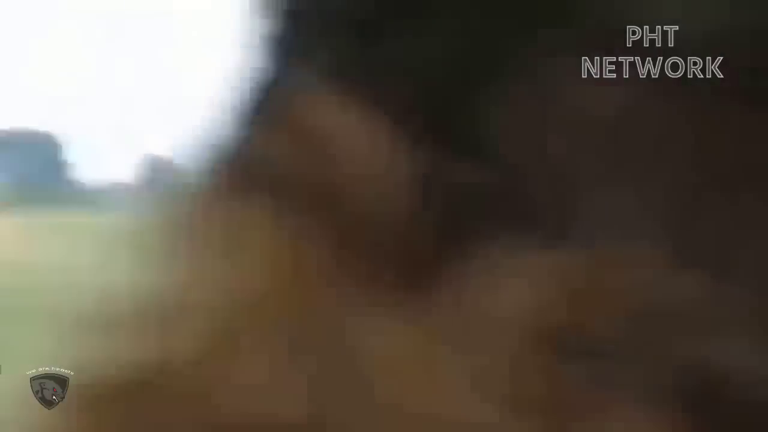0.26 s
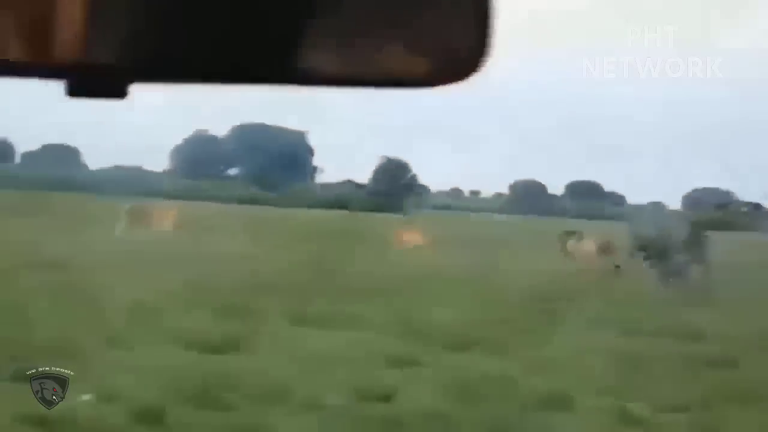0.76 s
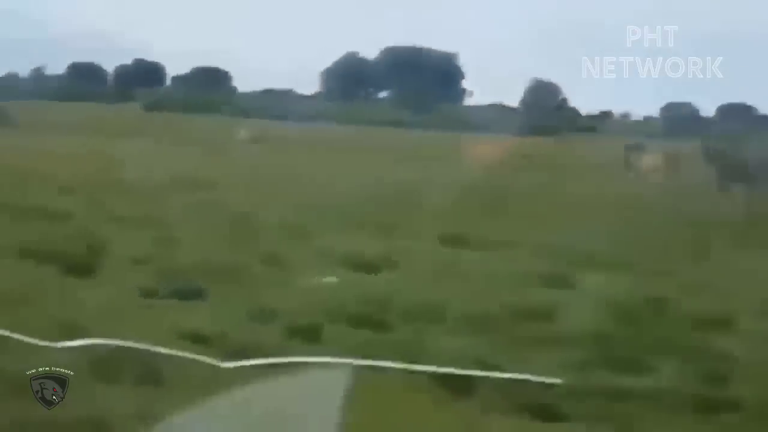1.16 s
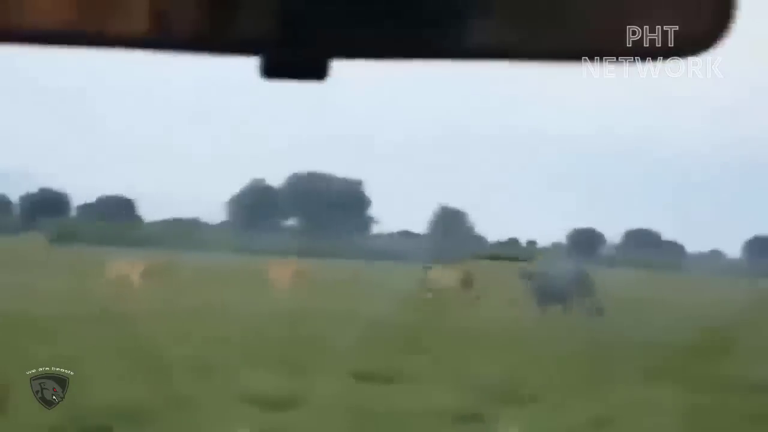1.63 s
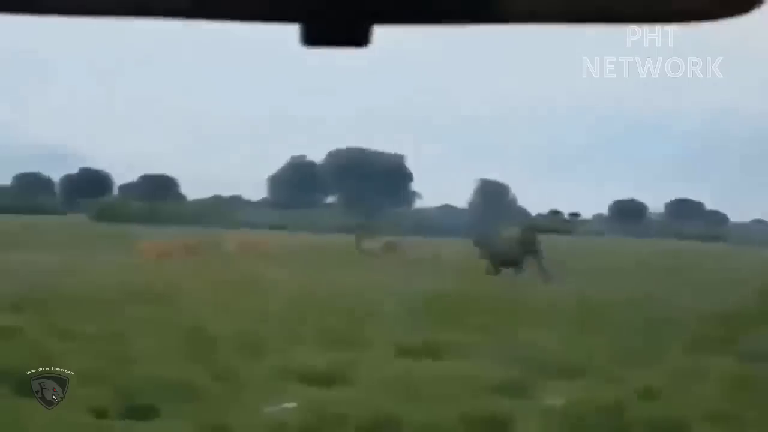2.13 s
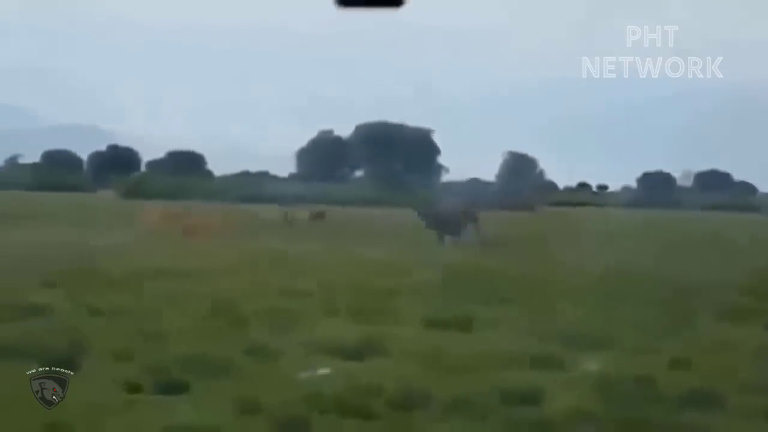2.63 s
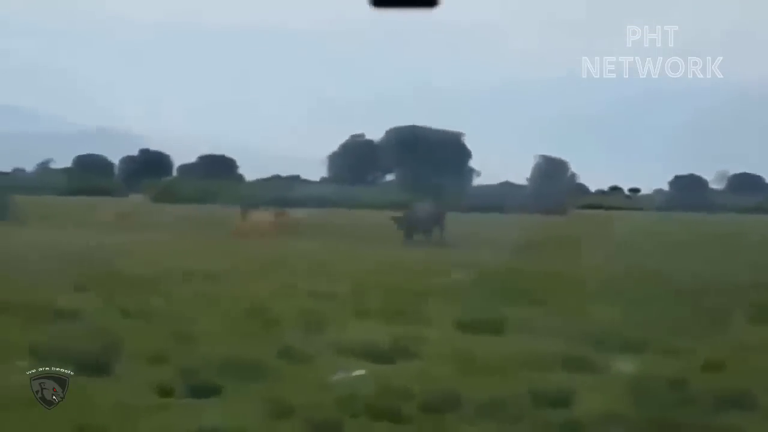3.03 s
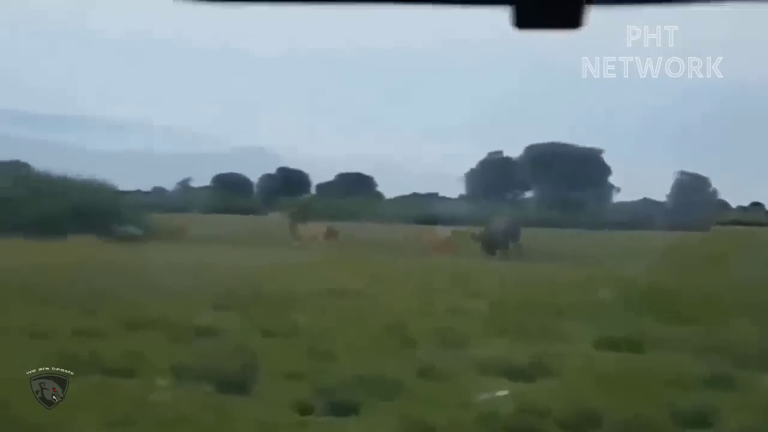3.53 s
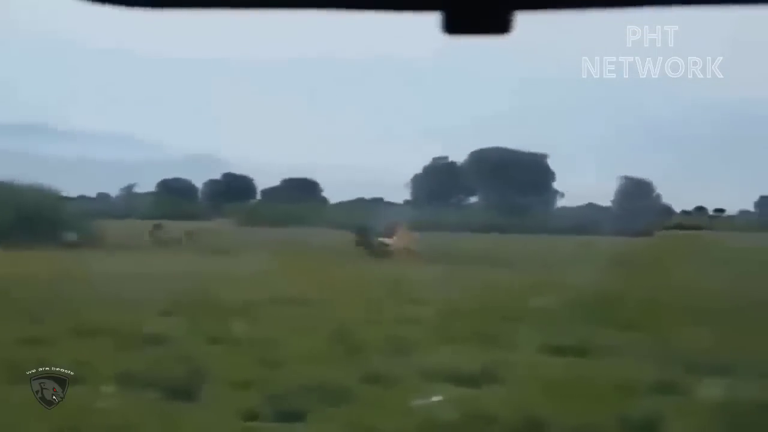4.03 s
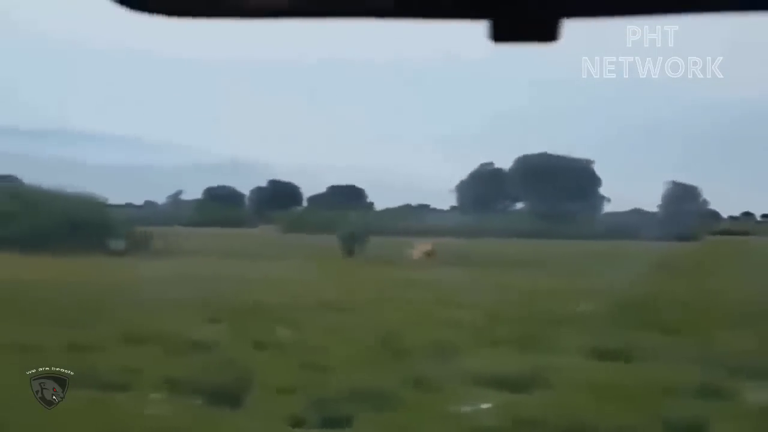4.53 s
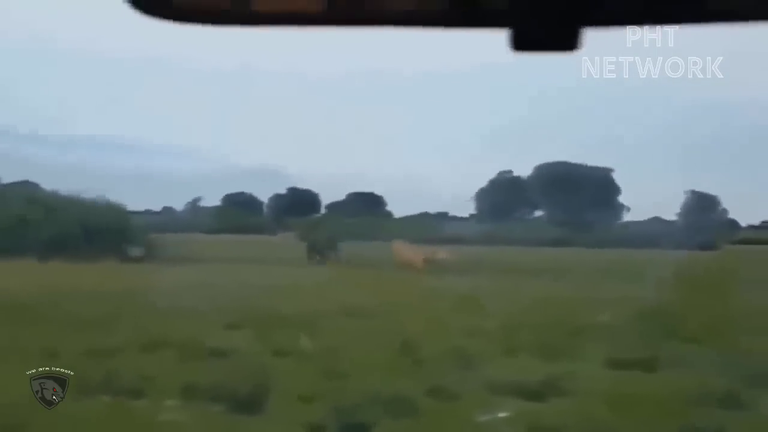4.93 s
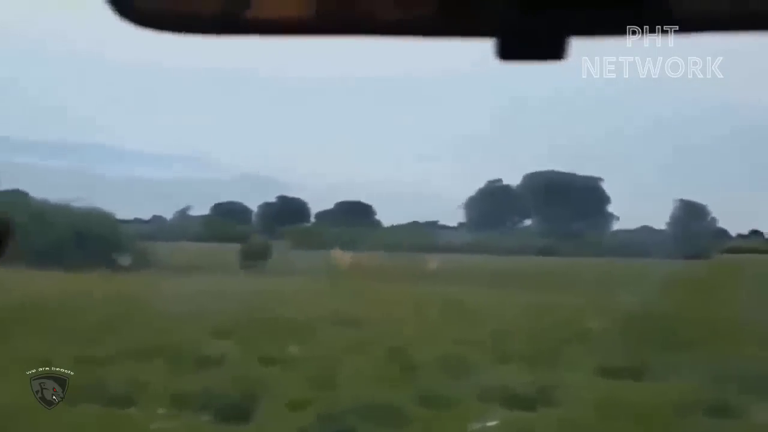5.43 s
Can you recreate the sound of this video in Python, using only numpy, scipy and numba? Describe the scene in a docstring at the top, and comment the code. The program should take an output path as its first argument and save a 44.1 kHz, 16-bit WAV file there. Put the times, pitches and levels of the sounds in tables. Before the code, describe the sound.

On open grassland, busy birds chirp and cry over a low throbbing hum while one large animal gives a coarse, guttural bellow and a short nasal intake.

```python
"""Open grassland: a buffalo straight ahead bellows once, long and rattling, then draws air through its muzzle.
The bellow is bursts of fold slaps ringing a long throat; the drawn breath is noise through the nostrils.
Birds mew, squawk, croak and trill as stacks of harmonics; small ones chirp as swept tones or rasp as
gliding noise, and the bushes scatter all their calls. Beneath lie a low throbbing rumble and a thin hiss,
with a rustle, two microphone bumps and one faint low tone."""
import sys
import numpy as np
from scipy import signal
from scipy.fft import rfft, irfft
from scipy.io import wavfile
from scipy.ndimage import uniform_filter1d
from numba import njit

SR = 44100
rng = np.random.default_rng(int(sys.argv[2]) if len(sys.argv) > 2 else 0)


def unload_wav(signal):
    """Save mono or channel-first audio to the path in sys.argv[1] as 16-bit WAV at rate SR, clipped to [-1, 1]."""
    wavfile.write(
        sys.argv[1],
        SR,
        np.round(np.clip(np.atleast_2d(signal).T, -1, 1) * 32767).astype(np.int16),
    )


N = 250047
TIME = np.arange(N) / SR  # [s]


def undb(db):
    """Decibels to gain."""
    return 10 ** (np.asarray(db) / 20)


def unit(x):
    """Scale to rms 1."""
    return x / np.sqrt(np.mean(x ** 2) + 1e-18)


def curves(table, t=TIME):
    """Each column of a table after the time column, joined by straight lines in time."""
    s, *columns = np.transpose(table)
    return [np.interp(t, s, c) for c in columns]


def swell(start, attack, hold, release):
    """Gain that rises, holds and falls, all times in seconds."""
    return np.interp(TIME, start + np.cumsum([0, attack, hold, release]), [0, 1, 1, 0])


def colour(points, hz):
    """Gain of a (frequency [Hz], level [dB]) spectrum at the given frequencies."""
    f, db = np.transpose(points)
    return undb(np.interp(np.log(np.maximum(hz, 1)), np.log(f), db))


def noise(points):
    """Noise of rms 1 with the given spectrum, dying away outside its ends."""
    hz = np.arange(N // 2 + 1) * SR / N
    low_end = np.minimum(hz / points[0][0], 1) ** 4
    high_end = np.minimum(points[-1][0] / (hz + 1), 1) ** 4
    white = rfft(rng.standard_normal(N))
    return unit(irfft(white * colour(points, hz) * low_end * high_end, N))


def wide_noise(points, side_db):
    """Stereo noise from a part shared by both channels and a part opposed between them."""
    return noise(points) + undb(side_db) * noise(points) * np.array([[1], [-1]])


def walk(rate):
    """Smooth chance of rms 1 that changes rate times a second."""
    k = max(int(SR / rate), 1)
    return unit(uniform_filter1d(np.repeat(rng.standard_normal(N // k + 1), k), k)[:N])


@njit
def svf(x, hz, width):
    """State-variable band-pass with a moving centre."""
    y, b, l = np.empty(len(x)), 0., 0.
    for i in range(len(x)):
        g, k = np.tan(np.pi * hz[i] / SR), width / hz[i]
        v = (b + g * (x[i] + 1e-18 - l)) / (1 + g * (g + k))
        b, l, y[i] = 2 * v - b, l + 2 * g * v, k * v
    return y


def ring(x, hz, width_hz):
    """One resonance, gain 1 at its centre, which may move."""
    return svf(x, hz * np.ones(N), float(width_hz))


def ring_twice(x, hz, width_hz):
    """Two equal resonances in a row, for steeper sides."""
    return ring(ring(x, hz, width_hz), hz, width_hz)


def ear_gains(pan_db):
    """Left and right gains of rms 1, with the left pan_db above the right."""
    return unit(undb(np.array([[pan_db], [-pan_db]]) / 2))


def place(x, pan_db, lag_ms):
    """Set a source left or right by level and by the lag of the right channel."""
    hz = np.arange(N // 2 + 1) * SR / N
    late = irfft(rfft(x) * np.exp(-2j * np.pi * hz * lag_ms / 1000), N)
    return ear_gains(pan_db) * np.array([x, late])


def bushes(x, wet_db, t60):
    """Add the diffuse scatter from grass and bushes, different at each ear, falling 60 dB in t60 seconds."""
    t = TIME[:SR // 2]
    tail = rng.standard_normal((2, len(t))) * undb(-60 * t / t60)
    tail /= np.linalg.norm(tail, axis=1, keepdims=True)
    return x + undb(wet_db) * signal.fftconvolve(x.mean(axis=0)[None], tail, axes=1)[:, :N]


# spectrum of the low rumble: (frequency [Hz], relative level [dB])
RUMBLE_SPECTRUM = [(18, 6), (30, -4.5), (42, -8.5), (58, 3.5), (75, -6), (100, -5.5), (122, -10),
                   (148, -5.5), (180, -15), (240, -15), (300, -19.5), (400, -30.5)]
RUMBLE_DB, RUMBLE_START_DB, RUMBLE_GROW_S = -44.5, -2.5, 1.5  # it starts weaker and grows


def rumble(throb_hz=16.0, throb_db=0.5):
    """Low noise throbs gently in both channels alike, over deep noise opposed between them."""
    throb = undb(throb_db * np.sin(2 * np.pi * throb_hz * TIME))
    growth_db = RUMBLE_START_DB * np.maximum(1 - (TIME / RUMBLE_GROW_S) ** 2, 0)
    central = unit(noise(RUMBLE_SPECTRUM) * throb) * undb(RUMBLE_DB + growth_db)
    opposed = undb(-47.5) * noise([(20, -5.0), (60, -22), (150, -23.5), (400, -38.0)]) * np.array([[1], [-1]])
    return central + opposed


# spectrum of the steady hiss: (frequency [Hz], relative level per Hz [dB])
HISS_SPECTRUM = [(300, -2.5), (500, -5), (1000, -6), (1500, -8.5), (2200, -7), (3200, -10), (4300, -12.5),
                 (6000, -14.5), (9000, -16), (13000, -16), (15500, -29)]
HISS_DB = -55


def hiss(flutter_db=2.0):
    """Wide noise whose level flutters a little."""
    return wide_noise(HISS_SPECTRUM, side_db=-1.0) * undb(HISS_DB + flutter_db * walk(45))


# spectrum of the rustle: (frequency [Hz], relative level [dB])
RUSTLE_SPECTRUM = [(150, 7), (400, -3), (900, -4), (1600, -3), (2600, -3.5), (3600, -6.5), (6000, -12.5),
                   (9000, -17), (13000, -14.5), (16000, -17)]
RUSTLE_ATTACK_S, RUSTLE_HOLD_S, RUSTLE_RELEASE_S, RUSTLE_DB = 0.49, 0.28, 0.44, -46


def rustle():
    """A soft flickering noise swells near the start."""
    leaves = wide_noise(RUSTLE_SPECTRUM, side_db=-4.0)
    flicker = undb(RUSTLE_DB + 1.5 * walk(28.7))
    return leaves * flicker * swell(0, RUSTLE_ATTACK_S, RUSTLE_HOLD_S, RUSTLE_RELEASE_S)


# soft bumps of the handled microphone: (time [s], level [dB])
BUMP_TIMES = [(0.361, -44.5), (.61, -44.5)]
# their dull spectrum: (frequency [Hz], relative level [dB])
BUMP_SPECTRUM = [(150, -0.5), (700, -5), (1500, -7.5), (4000, -17)]
BUMP_ATTACK_S, BUMP_RELEASE_S = 0.0091, 0.049


def bumps():
    """Dull brushes against the microphone amid the rustle: short bursts of noise."""
    bursts = sum(undb(db) * swell(start, BUMP_ATTACK_S, 0, BUMP_RELEASE_S) for start, db in BUMP_TIMES)
    return noise(BUMP_SPECTRUM) * bursts


LOW_TONE_START_S, LOW_TONE_ATTACK_S, LOW_TONE_HOLD_S, LOW_TONE_RELEASE_S = 3.65, 0.101, 0.124, 0.14
LOW_TONE_HZ, LOW_TONE_DB = 276, -55.5  # pitch at full strength, before the waver


def low_tone(waver=0.01, sag=0.16):
    """A short, faint, wavering sine whose pitch sags where it is weak."""
    strength = swell(LOW_TONE_START_S, LOW_TONE_ATTACK_S, LOW_TONE_HOLD_S, LOW_TONE_RELEASE_S)
    hz = LOW_TONE_HZ * (1 + waver * walk(40) - sag * (1 - strength))
    return unit(np.sin(2 * np.pi * np.cumsum(hz) / SR)) * undb(LOW_TONE_DB) * strength


def far_birds(lowest_db=-64.5, range_db=4, count=190):
    """A loose chorus of faint falling chirps further off, at chance times, leaning left."""
    out = np.zeros((2, N))
    for when, pitch, span, size, side in rng.random((count, 5)):
        start = when * N / SR
        at = np.flatnonzero((TIME >= start) & (TIME < start + .03 + .05 * span))
        hz = 2600 * 2.6 ** pitch * np.linspace(1, .72, len(at))
        note = np.sin(2 * np.pi * np.cumsum(hz) / SR) * np.hanning(len(at))
        out[:, at] += undb(lowest_db + range_db * size) * note * np.array([[1], [side]])
    return out


# hoarse, scratchy bird notes: (time [s], length [s], start centre [Hz], end centre [Hz], filter width [Hz],
# level [dB], left minus right [dB])
RASP_NOTES = [(0, 0.049, 4800, 4800, 2600, -47, -1), (0.134, 0.054, 6650, 7500, 2200, -46.5, -2),
              (0.176, 0.083, 7600, 6100, 1400, -49.5, 1), (0.233, 0.073, 4900, 3270, 2000, -47.5, 1),
              (0.36, 0.33, 2450, 2600, 1100, -53, 1), (0.525, .11, 5260, 4700, 1900, -50, 4),
              (1.493, 0.057, 2280, 3150, 1200, -44.5, -3), (1.532, 0.034, 2710, 1520, 1000, -46.5, 15),
              (1.579, 0.015, 2650, 1530, 800, -44, 12), (1.265, .02, 2500, 2100, 700, -41, 14),
              (3.988, 0.082, 6200, 3740, 900, -57, 6), (4.102, .05, 2500, 2060, 700, -48, 9),
              (4.358, 0.058, 2700, 2450, 800, -44, 18), (4.478, 0.019, 2840, 2430, 600, -43, -12)]


def rasps(grain_db=4, grain_hz=260):
    """Hoarse bird notes: scratchy air through one gliding resonance, passed twice."""
    out = np.zeros((2, N))
    air = rng.standard_normal((2, N)) * undb(grain_db * walk(grain_hz))
    for start, length, first_hz, last_hz, width_hz, db, pan_db in RASP_NOTES:
        at = np.flatnonzero((TIME >= start) & (TIME < start + length))
        hz = np.geomspace(first_hz, last_hz, len(at))
        width = float(width_hz)
        note = np.array([svf(svf(ear[at], hz, width), hz, width) for ear in air])
        out[:, at] += undb(db) * unit(note * signal.windows.tukey(len(at), .6) * ear_gains(pan_db))
    return out


# quick upward flicks: (time [s], length [s], start pitch [Hz], level [dB], left minus right [dB], rise [octaves])
UPWARD_FLICKS = [(0.038, 0.024, 4400, -45, 19, 0.77), (0.205, .016, 4700, -51, 4, 0.51),
                 (0.526, 0.012, 3500, -41, 16, 0.89), (0.565, 0.0088, 3500, -41, 17, .62),
                 (0.6, 0.012, 3500, -42, 18, .62), (1.268, 0.029, 1270, -49, 16, .32),
                 (1.29, .048, 1950, -37, 22, .45), (1.561, 0.025, 1400, -38, 19, 1),
                 (3.826, 0.023, 1975, -46.5, 21, 0.67), (4.469, 0.012, 2400, -36, -15, 0.9)]
# steep downward slurs: (time [s], length [s], start pitch [Hz], level [dB], left minus right [dB])
DOWNWARD_SLURS = [(0.119, 0.031, 6240, -47, 20), (0.235, 0.021, 4400, -37, 17),
                  (0.246, 0.067, 3240, -42.5, 9), (1.519, 0.027, 4600, -47, -15),
                  (1.875, 0.077, 5620, -50, 9), (2.078, 0.054, 5760, -38.5, -1),
                  (2.104, 0.069, 7370, -44, 2), (3.045, 0.065, 3910, -52, 20),
                  (3.726, 0.052, 6820, -48.5, 8), (3.758, 0.056, 3890, -41.5, 26),
                  (4.29, 0.026, 7370, -48, 13), (4.317, 0.045, 3740, -36.5, 25),
                  (4.395, 0.059, 2900, -41.5, 24), (4.759, 0.027, 5020, -47, 17)]
# level pips that droop at the end: (time [s], length [s], pitch [Hz], level [dB], left minus right [dB])
DROOPING_PIPS = [(0.93, 0.087, 7300, -54.5, 5), (1.324, 0.08, 4180, -57, -1),
                 (1.442, 0.034, 4780, -53.5, 8), (1.675, 0.16, 8230, -54, 4),
                 (1.685, 0.056, 7120, -49.5, 20), (2.311, 0.061, 4170, -53, 24),
                 (2.697, 0.035, 5800, -54.5, 10), (2.812, 0.075, 6970, -54.5, 11.5),
                 (2.963, 0.028, 4070, -48, 11), (3.122, 0.024, 4080, -46, 14), (3.153, 0.054, 6280, -54, 8),
                 (3.674, 0.069, 6340, -53.5, 2), (4.132, 0.022, 5040, -50.5, 14),
                 (4.899, 0.053, 4170, -45.5, 13), (5.137, 0.043, 4160, -54.5, 13),
                 (5.259, 0.025, 5180, -51, 9), (5.367, 0.089, 7220, -54.5, 14),
                 (5.437, 0.038, 5300, -52, 6), (5.61, 0.058, 5800, -49.5, 7)]
SLUR_OCTAVES_PER_S, PIP_DROOP_OCTAVES = 15.5, .12
FLICK_BEND, SLUR_BEND, PIP_BEND = 0.58, 0.96, 2.6  # curve of the sweep: above 1 it moves late


def chirps(waver=0.0219, flicker_db=3.5, husk_db=-9, husk_width=0.1356, husk_db_per_octave=7, husk_from_hz=5000):
    """Small birds' short whistles, each one sweep, with a husky edge that grows on the higher notes."""
    out = np.zeros((2, N))
    shake, scrape, flicker = walk(500), walk(1500), walk(200)
    notes = [(*row, FLICK_BEND) for row in UPWARD_FLICKS]
    notes += [(*row, -SLUR_OCTAVES_PER_S * row[1], SLUR_BEND) for row in DOWNWARD_SLURS]
    notes += [(*row, -PIP_DROOP_OCTAVES, PIP_BEND) for row in DROOPING_PIPS]
    for start, length, first_hz, db, pan_db, octaves, power in notes:
        at = np.flatnonzero((TIME >= start) & (TIME < start + length))
        arc = first_hz * 2 ** (octaves * np.linspace(0, 1, len(at)) ** power)
        # each bird reaches the two ears out of step
        ears = np.array([[0], [np.pi / 2 * (2 * rng.random() - 1)]])
        tone = np.sin(2 * np.pi * np.cumsum(arc * (1 + waver * shake[at])) / SR + ears)
        husk = np.sin(2 * np.pi * np.cumsum(arc * (1 + husk_width * scrape[at])) / SR + ears)
        husk_gain = undb(husk_db + husk_db_per_octave * np.log2(first_hz / husk_from_hz))
        shape = unit(signal.windows.tukey(len(at), .7) * undb(flicker_db * flicker[at]))
        out[:, at] += undb(db) * shape * ear_gains(pan_db) * (tone + husk_gain * husk)
    return out


def bird_call(table, shape, jitter, shimmer_db, tuned=False, count=14):
    """Harmonics shaped by a throat, fixed (Hz) or tuned to the pitch (multiples); roughness shakes them."""
    on = (TIME >= table[0][0]) & (TIME < table[-1][0])
    hz, db, rough, *tilt = curves(table, TIME[on])
    hz = hz * (1 + jitter * rough * walk(450)[on])
    phase = 2 * np.pi * np.cumsum(hz) / SR
    k = np.arange(1, count + 1)[:, None]
    # the treble tilt acts above 1800 Hz; a table without that column has none
    tilt_gains = undb(sum(tilt) * np.log2(np.maximum(k * hz / 1800, 1)))
    gains = colour(shape, k if tuned else k * hz) * tilt_gains
    tone = (gains * np.sin(k * phase + rng.uniform(0, 2 * np.pi, (count, 1)))).sum(axis=0)
    tone /= np.sqrt((gains ** 2).sum(axis=0) / 2)
    level = undb(db + shimmer_db * rough * walk(300)[on])
    out = np.zeros(N)
    out[on] = tone * level * signal.windows.tukey(len(hz), .06)
    return out


# buzzing trills, before arch and beats: (time [s], length [s], start pitch [Hz], end pitch [Hz], level [dB])
TRILL_CALLS = [(0.108, 0.125, 2480, 2427, -48), (1.202, 0.098, 2430, 2775, -43.5),
               (1.285, 0.079, 2285, 2724, -45), (4.017, 0.08, 2454, 2518, -35.5),
               (4.128, 0.029, 2120, 1850, -43.5)]
TRILL_RATE_HZ = 53


def trills(depth_db=8, arch=0.0302, fade_db=-6, rough=0.2, beat_swing=0.059):
    """A whistle on a shallow arch of pitch, chopped into quick beats that each lift the pitch."""
    beak = [(3000, 10.0), (4500, -7), (8000, -16)]  # (frequency [Hz], relative level [dB])
    u = np.linspace(0, 1, 80)
    edge = (2 * u - 1) ** 2  # 1 at both ends, 0 in the middle
    whistle = 0
    for start, length, first_hz, last_hz, db in TRILL_CALLS:
        beat = -np.cos(2 * np.pi * TRILL_RATE_HZ * length * u) - .5
        hz = (first_hz + (last_hz - first_hz) * u) * (1 + arch * (1 - edge) + beat_swing * beat)
        level_db = db + fade_db * edge ** 2 + depth_db * beat
        course = np.column_stack([start + length * u, hz, level_db, np.full_like(u, rough)])
        whistle = whistle + bird_call(course, beak, jitter=0.142, shimmer_db=3.0, count=2)
    return whistle


# harsh squawks on the right: (time [s], held length [s], held pitch [Hz], held level [dB])
SQUAWK_CALLS = [(1.53, .154, 504, -39), (4.322, .148, 467.8, -39)]
# harmonics of a squawk: (multiple of the pitch [1], relative level [dB])
SQUAWK_HARMONICS = [(2, -31.5), (4, -26), (5, -15), (6, -13.5), (7, -8), (8, -6), (9, 1.5), (10, -14),
                    (11, -10), (12, -23), (14, -27)]
SQUAWK_ATTACK_S, SQUAWK_SETTLE_S, SQUAWK_RELEASE_S = 0.032, 0.0268, 0.026


def squawk(start, length, hz, db, slack=.6, turn=.94, overshoot=1.03, sag=0.99, hoarse=0.73, clear=0.14,
           edge_db=3, onset_db=-11, end_db=-22):
    """Scoops up to a held note that sags in the middle, then drops off it; loud and rough at both turns."""
    end = start + length
    # (time [s], pitch [Hz], level [dB], roughness [1])
    course = [(start - SQUAWK_ATTACK_S, slack * hz, db + onset_db, hoarse),
              (start, turn * hz, db + edge_db, hoarse),
              (start + SQUAWK_SETTLE_S / 2, overshoot * hz, db, hoarse / 2),
              (start + SQUAWK_SETTLE_S, hz, db, clear),
              (start + length / 2, sag * hz, db, clear),
              (end - SQUAWK_SETTLE_S, hz, db, clear),
              (end - SQUAWK_SETTLE_S / 2, overshoot * hz, db, hoarse / 2),
              (end, turn * hz, db + edge_db, hoarse),
              (end + SQUAWK_RELEASE_S / 2, slack * hz, db + edge_db, hoarse / 2),
              (end + SQUAWK_RELEASE_S, hz / 2, db + end_db, hoarse)]
    return bird_call(course, SQUAWK_HARMONICS, jitter=0.062, shimmer_db=0.5, tuned=True)


# faint nasal mews: (crest time [s], rise [s], fall [s], crest pitch [Hz], level [dB],
# treble tilt [dB/octave], change of tilt by the end of the fall [dB/octave], roughness at the crest [1])
MEW_CALLS = [(2.68, .14, 0.11, 676.6, -46, -12, 9, 0.14), (2.79, 0.13, 0.083, 1031, -51, -10, 11, 0.45),
             (4.12, .13, 0.031, 639, -50.5, -19, -9, 0.1), (4.305, .205, 0.068, 1027, -46.5, -20, 32, 0.18),
             (5.68, .16, .1, 727, -50, -14, 0, 0.41)]
# throat of the mewing birds: (frequency [Hz], relative level [dB])
MEW_SPECTRUM = [(700, -18), (1200, -7), (1550, 2.5), (2100, 8.5), (2550, 7.5), (3050, 9.5), (3750, 12),
                (4300, 5), (6500, -17), (9000, -46)]
MEW_ARCH_OCTAVES, MEW_ARCH_POWER = .5, 1.4  # depth of the arch and roundness of its crest


def mew(crest, rise, fall, crest_hz, db, tilt_db, opening_db, clear, lead=1.5, faint_db=-15, hoarse=0.48,
        closing=0.27, fade_db=-10):
    """An arch of pitch, faint and hoarse at first, clearing as it climbs; its treble may shift on the fall."""
    u = np.linspace(-lead, 1, 60)  # 0 at the crest
    when = crest + u * np.where(u < 0, rise, fall)
    hz = crest_hz * 2 ** (-MEW_ARCH_OCTAVES * np.abs(u) ** MEW_ARCH_POWER)
    early = (np.minimum(u, 0) / lead) ** 2
    late = np.maximum(u, 0) ** 2
    level_db = db + faint_db * early + fade_db * late ** 10
    rough = clear + hoarse * early + closing * late
    course = np.column_stack([when, hz, level_db, rough, tilt_db + opening_db * late])
    return bird_call(course, MEW_SPECTRUM, jitter=0.0592, shimmer_db=4)


# course of the croak: (time [s], pitch [Hz], level [dB], roughness [1], treble tilt [dB/octave])
CROAK_COURSE = [(4.58, 484.5, -56, 1.2, -20), (4.645, 471, -52, 0.95, -27), (4.679, 550, -44, 0.9, -16),
                (4.698, 467, -42.5, 0.8, -9), (4.711, 483, -40, 0.56, -2), (4.719, 542, -42, 0.58, 1),
                (4.736, 522, -40.5, 0.6, 5), (4.746, 420, -39, 1.2, 13), (4.764, 342, -55, 1, 12)]
# its throat: (frequency [Hz], relative level [dB])
CROAK_SPECTRUM = [(900, -19), (1500, -4.5), (2000, 10.5), (2600, 0), (3200, 3.5), (4000, -12.5),
                  (6500, -21), (9000, -42)]


def croak():
    """A warbling croak: harmonics that swell and end in a rasp."""
    return bird_call(CROAK_COURSE, CROAK_SPECTRUM, jitter=0.0464, shimmer_db=1.0)


# course of the long cry: (time [s], pitch [Hz], level [dB], roughness [1], treble tilt [dB/octave])
CRY_COURSE = [(.75, 405, -69, 0.6, -9), (.82, 477, -45.5, 0.47, -6), (.865, 588, -47, 0.43, -1),
              (.9, 729, -36.5, 0, -4), (.932, 775, -45.5, 0.06, -4), (.985, 720, -36, 0, -3),
              (1.03, 635, -46, 0.25, -1), (1.075, 633, -35.5, 0.18, 11), (1.1, 604, -40, 0.43, 8),
              (1.118, 488, -47, 0.9, 15), (1.135, 433, -53, 0.8, 6)]
# its throat: (frequency [Hz], relative level [dB])
CRY_SPECTRUM = [(700, -32), (1200, -7), (1500, -2), (1800, -0.5), (2150, 12), (2340, -0.5), (2550, 7),
                (3050, -6), (3450, 0.5), (3800, -2.5), (4300, -18), (6500, -34), (9000, -52)]


def cry():
    """A bird's long cry: harmonics on an arch of pitch with a held shoulder and a rough break."""
    return bird_call(CRY_COURSE, CRY_SPECTRUM, jitter=0.0456, shimmer_db=2.5)


# resonances of the nostrils: (centre [Hz], width of each pass [Hz], gain [dB])
NOSTRIL_RESONANCES = [(720, 130, 6), (1130, 270, 4), (1340, 350, -1), (2180, 410, -9), (2860, 260, -13)]
INTAKE_START_S, INTAKE_ATTACK_S, INTAKE_HOLD_S, INTAKE_RELEASE_S, INTAKE_DB = 3.053, 0.15, 0.1, 0.23, -48


def intake():
    """Air rushes in through the buffalo's nostrils: noise through their resonances."""
    air = rng.standard_normal(N)
    rush = sum(undb(db) * ring_twice(air, hz, width) for hz, width, db in NOSTRIL_RESONANCES)
    return unit(rush) * undb(INTAKE_DB) * swell(INTAKE_START_S, INTAKE_ATTACK_S, INTAKE_HOLD_S, INTAKE_RELEASE_S)


# course of the bellow: (time [s], effort [dB], first throat resonance [Hz], second throat resonance [Hz],
# upper mouth resonance [Hz], chest gain [dB], throat gain [dB])
BELLOW_COURSE = [(1.72, -16, 163, 603, 1110, 12, 5), (1.79, -9, 173, 625, 1130, 3.5, 8),
                 (1.85, -3.5, 190, 624, 1133, 3, 2), (1.915, -1, 195, 593, 1140, -4.5, 1),
                 (1.949, -0.5, 228, 595, 1124, 1.5, 4), (2.03, 0.5, 212.6, 596, 1164, -1.5, -0.5),
                 (2.137, 1.5, 228, 562, 1162, 4, 5), (2.26, 0, 210.5, 588, 1100, 5.5, -2),
                 (2.34, -2.5, 175, 607, 1126, 3, -3), (2.4, -3, 184, 555, 1090, 5.5, -2.5),
                 (2.49, -0.5, 203, 552, 1100, 8, 4.5), (2.63, 2, 195.4, 555, 1070, 2, -6),
                 (2.72, -3.5, 147, 606, 1048, -1, -4.5), (2.79, -14.5, 124, 637, 1010, -3, -3)]
# hard slaps, when the stuck folds burst open: (time [s], level above the flutter [dB],
# rate of the flutter that follows [Hz], change of its last beat [dB])
SLAP_BURSTS = [(1.750, 8.5, 45.8, 3), (1.789, 8.5, 46.7, 2.5), (1.825, 0.5, 67.2, 1.5),
               (1.855, 5, 70.2, 1.5), (1.884, 4, 67, -1), (1.914, 4, 65.7, 1), (1.945, 6.5, 105.5, -3.5),
               (1.973, 7.5, 60.3, 0), (1.999, 6, 121.6, -5), (2.018, 3.5, 109.7, -16), (2.047, 6, 99.1, -5),
               (2.086, 4.5, 99.2, -8), (2.114, 3.5, 99.4, -9), (2.144, 6.5, 91.4, -8),
               (2.181, -2.5, 101, -6), (2.210, 3.5, 85.9, -9), (2.243, 6.5, 83.5, -8), (2.277, 7.5, 83, 2),
               (2.350, 5, 93, -13), (2.373, 1.5, 75.3, 4), (2.399, 5, 81.4, -8), (2.424, 6.5, 82.5, -3.5),
               (2.448, 4, 81.1, -11), (2.543, 4, 82.6, -0.5), (2.590, 4, 71.3, -5), (2.643, 3.5, 65, -1.5),
               (2.674, 2.5, 85, 1), (2.712, 2, 84, -8), (2.737, 4, 62.6, 5)]
STICK_CYCLES = .55  # the folds hold still about this long or longer before a hard slap


def fold_slaps(scatter_db=2.2, jitter=0.03):
    """The slack folds slam open, flutter at a rate of their own each time, and stick again after a last beat."""
    slaps = np.zeros(N)
    ends = [row[0] for row in SLAP_BURSTS[1:]]
    ends.append(BELLOW_COURSE[-1][0] - 1 / SLAP_BURSTS[-1][2])
    for (start, accent_db, hz, last_db), end in zip(SLAP_BURSTS, ends):
        chance = rng.standard_normal((12, 2))  # columns: timing, level
        when = start + np.concatenate([[0], np.cumsum((1 + jitter * chance[1:, 0]) / hz)])
        when = when[when < max(end - STICK_CYCLES / hz, start + 1 / SR)]
        db = scatter_db * chance[:len(when), 1]
        db[-1] += last_db
        db[0] = accent_db
        effort_db = curves(BELLOW_COURSE, when)[0]
        slaps[(when * SR).astype(int)] += undb(db + effort_db)
    return slaps


# fixed resonances of the muzzle: (centre [Hz], width [Hz], relative gain [dB])
MUZZLE_RESONANCES = [(1370, 160, -14), (1800, 260, -24), (2280, 220, -19), (3080, 400, -20)]
# resonances of the slaps' crack in the mouth: (centre [Hz], width [Hz], relative gain [dB])
CRACK_RESONANCES = [(2030, 93, -3.5), (2990, 470, -4.5), (4070, 220, -30)]
MOUTH_HZ = 942  # the lower mouth resonance stays put


def bellow(gain_db=15.0, body_db=-3, chest_db=6.0, second_db=2, mouth_db=-1, upper_db=-0.5, rasp_db=-19.5,
           crack_db=-25, flow_db=-43, flow_follow=0.19, flow_fade_s=0.044):
    """Slaps and the air behind them ring a long throat whose resonances quiver, and sink as the call runs out."""
    effort_db, first_hz, second_hz, upper_hz, open_db, throat_db = curves(BELLOW_COURSE)
    mouth_hz = (MOUTH_HZ + upper_hz) / 2  # midway between the two mouth resonances
    quiver = 1 + 0.012 * walk(60)  # the soft throat walls shake
    slaps = fold_slaps()
    # each slap lets a short turbulent puff through the mouth, decaying over 2 ms
    puffs = signal.lfilter([1], [1, -np.exp(-1 / (.002 * SR))], slaps) * rng.standard_normal(N)
    raspy = slaps + undb(rasp_db) * puffs

    chest = undb(chest_db + open_db) * ring(slaps, first_hz * quiver, 13.6)
    chest = chest + undb(body_db) * ring(slaps, 134.6, 17)
    throat = undb(second_db + throat_db) * ring(slaps, second_hz * quiver, 12.0)
    lower_mouth = undb(mouth_db) * ring(slaps, MOUTH_HZ, 124)
    upper_mouth = undb(upper_db) * ring(slaps, upper_hz * quiver, 64)
    muzzle = sum(undb(db) * ring(raspy, hz, width) for hz, width, db in MUZZLE_RESONANCES)
    # fleshy folds close softly, so the treble is only a brief crack
    soft = signal.butter(2, 1500, fs=SR, output="sos")
    voice = signal.sosfilt(soft, chest - throat - lower_mouth + upper_mouth + muzzle)
    crack = sum(undb(crack_db + db) * ring(raspy, hz, width) for hz, width, db in CRACK_RESONANCES)

    air = rng.standard_normal(N)
    mouth_air = ring(ring(air, mouth_hz, 360), mouth_hz, 350)
    throat_air = 1.24 * ring_twice(air, second_hz, 210)
    chest_air = 0.34 * ring(ring(air, 0.75 * first_hz, 86), 0.95 * first_hz, 96)
    flow = unit(mouth_air + throat_air + chest_air)
    # the air starts just before the voice, grows with effort and outlasts it
    start, end = BELLOW_COURSE[0][0], BELLOW_COURSE[-1][0]
    blowing = swell(start - flow_fade_s, flow_fade_s, end - start - flow_fade_s / 2, flow_fade_s)
    return undb(gain_db) * (voice + crack) + flow * undb(flow_db + flow_follow * effort_db) * blowing


def scene():
    """The buffalo straight ahead, birds ahead and to both sides, over the rumble and hiss."""
    buffalo = bellow() + intake()
    mews = sum(mew(*call) for call in MEW_CALLS)
    calls_ahead = mews + cry() + croak()
    squawks = sum(squawk(*call) for call in SQUAWK_CALLS)
    ahead = bushes(place(calls_ahead, pan_db=-1.5, lag_ms=-0.045), wet_db=-6, t60=0.17)
    right = bushes(place(squawks, pan_db=-27, lag_ms=-0.13), wet_db=-2.0, t60=0.18)
    trilling = bushes(place(trills(), pan_db=3.0, lag_ms=0.05), wet_db=-2.5, t60=0.21)
    small = bushes(chirps() + rasps() + far_birds(), wet_db=-5, t60=.3)
    foreground = buffalo + ahead + right + trilling + small
    return foreground + low_tone() + bumps() + rumble() + hiss() + rustle()


TOP_HZ = 14900


def record(dry):
    """The hardest slaps are squashed flat and the top is cut."""
    squashed = dry / (1 + (dry / .11) ** 6) ** (1 / 6)  # levels off at 0.11
    return signal.sosfilt(signal.ellip(8, .2, 70, TOP_HZ, fs=SR, output="sos"), squashed)


dry = scene()
out = record(dry)
unload_wav(out)
```